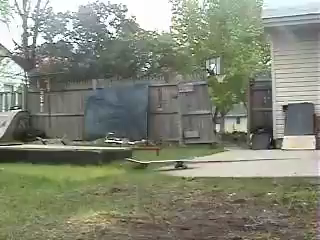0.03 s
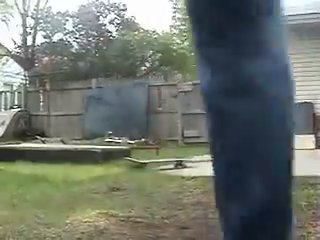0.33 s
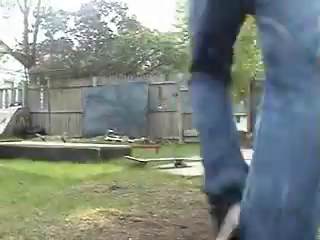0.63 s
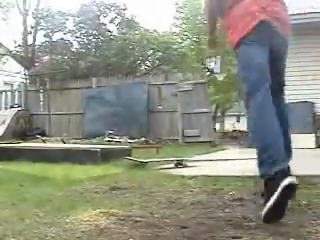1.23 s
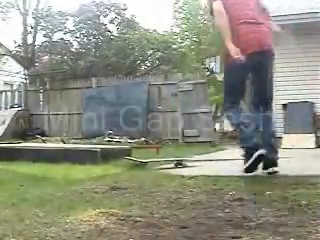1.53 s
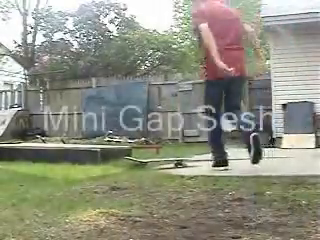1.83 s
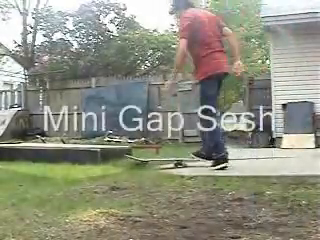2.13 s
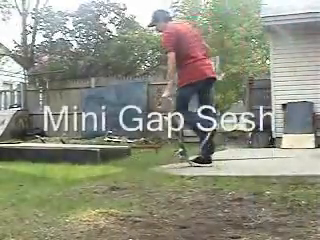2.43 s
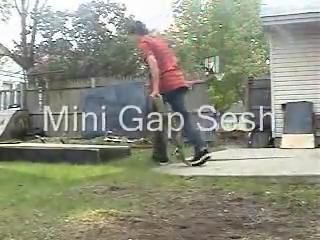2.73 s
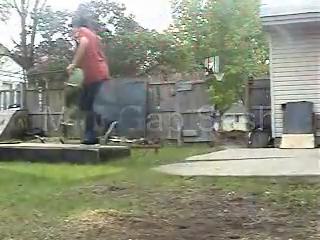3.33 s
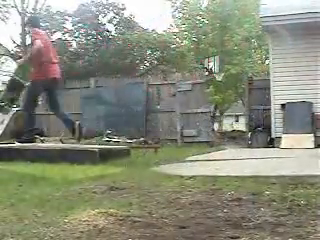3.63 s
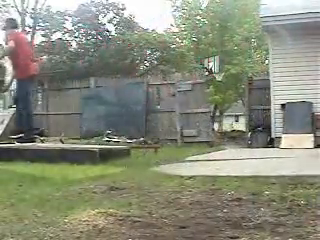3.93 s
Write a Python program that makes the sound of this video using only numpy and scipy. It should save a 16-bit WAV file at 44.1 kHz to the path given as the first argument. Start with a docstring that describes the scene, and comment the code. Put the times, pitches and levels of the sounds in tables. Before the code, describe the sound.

Footsteps pass close by from the start, with swishing trousers and a loud shoe scuff at about 0.4 seconds, then lighter steps and twig snaps until 1.3. At 2.2 seconds a skateboard knocks sharply on concrete, its metal parts clacking as it scrapes until about 2.6. A hollow wooden thump follows at 3.1. Wind rumbles on the microphone near the end, over faint traffic, leaves and a thin motor whine.

```python
"""Footsteps pass, one shoe scuffing close by; a skateboard knocks, clacks and scrapes; a box thumps.
A skater crosses a fenced backyard, past a camera on the ground. He stamps his board upright on the
concrete patio: blows ring the deck and metal trucks, grit shakes the dragged tail. Then he steps on
to a hollow wooden box. Behind: far traffic and leaves, wind on the microphone, the camera's motor."""
import sys
import numpy as np
from scipy import signal
from scipy.fft import rfft, irfft
from scipy.io import wavfile

SR = 44100
rng = np.random.default_rng(int(sys.argv[2]) if len(sys.argv) > 2 else 0)


def store_pcm(level_fs):
    """Save levels as 16-bit WAV."""
    pcm = np.round(np.clip(level_fs, -1, 1) * 32767).astype(np.int16)
    wavfile.write(sys.argv[1], SR, np.atleast_2d(pcm).T)


N = 176400
T = np.arange(N) / SR

# friction hiss of sole and cloth: f/Hz, density/dB
HISS_SPECTRUM = [(300, -15), (1200, 2), (2500, 1.5), (4000, -6), (7500, -14.5)]
# wooden deck: f/Hz, level/dB, t60/s
DECK_MODES = [(286, -8, 0.02), (520, -5.5, 0.024), (724, -3, 0.019), (950, 0, 0.021), (1300, 0, 0.029),
              (1630, -1.5, 0.024), (1940, -7, 0.03), (2340, -5, 0.022), (2580, -7.5, 0.017),
              (2990, -6.5, 0.013), (4500, -4.5, 0.0048), (5840, -5.5, .003)]


def from_db(db):
    """Decibels to gain."""
    return 10 ** (np.asarray(db) / 20)


def unit_rms(x):
    """Scale to unit power."""
    return x / np.sqrt(np.mean(x ** 2) + 1e-20)


def at_peak(x, db):
    """Scale to a peak level."""
    return from_db(db) * x / np.abs(x).max()


def held_gain(points):
    """Gain from (t/s, level/dB) points; ends held."""
    return from_db(np.interp(T, *np.transpose(points)))


def gated_gain(points):
    """Gain from (t/s, level/dB) points; zero outside them."""
    return held_gain(points) * (T >= points[0][0]) * (T <= points[-1][0])


def decay(start_s, t60_s):
    """Sudden onset, exponential fall."""
    return (T >= start_s) * from_db(-60 * np.maximum(T - start_s, 0) / t60_s)


def colour(x, points):
    """Filter by (f/Hz, gain/dB) points."""
    hz, db = np.transpose(points)
    bins_hz = np.arange(N // 2 + 1) * SR / N + 1e-3
    return irfft(rfft(x) * from_db(np.interp(np.log(bins_hz), np.log(hz), db)), N)


def noise(spectrum):
    """Coloured noise of unit power."""
    return unit_rms(colour(rng.standard_normal(N), spectrum))


def butter(x, edge_hz, kind="low", order=1):
    """Butterworth filter."""
    return signal.sosfilt(signal.butter(order, edge_hz, kind, fs=SR, output="sos"), x)


def mode(x, hz, t60_s):
    """One damped resonance, low-passed at its own pitch."""
    r, w = np.exp(-np.log(1000) / (t60_s * SR)), 2 * np.pi * hz / SR
    ringing = signal.lfilter([1, -r * np.cos(w)], [1, -2 * r * np.cos(w), r * r], x + 1e-18)
    return butter(ringing, hz)


def body(x, modes, vary_db=0):
    """An object's modes, alternating in sign, their levels scattered by vary_db."""
    return sum((-1) ** k * from_db(db + rng.normal(0, vary_db)) * mode(x, hz, t60_s)
               for k, (hz, db, t60_s) in enumerate(modes))


def click(t_s):
    """Unit impulse."""
    return (np.arange(N) == int(t_s * SR)) * 1.


def contact(t_s):
    """Hard contact: a click and a brief crack of crushed grit."""
    crack = rng.standard_normal(N) * decay(t_s, t60_s=0.011)
    return click(t_s) + from_db(-2.5) * crack / np.linalg.norm(crack)


def traffic_and_leaves():
    """A distant wash, wider in the treble."""
    spectrum = [(25, -20), (45, -13.5), (70, -7.5), (130, -5), (180, -3), (380, -6), (600, -3), (1100, -1),
                (1500, -5), (2100, -11.5), (3300, -20), (4700, -23.5), (6300, -27.5), (7800, -36.5)]  # wash: f/Hz, density/dB
    levels = [(.13, -29.5), (.7, -31), (1.2, -31.5), (2.0, -31), (3.0, -31), (4.0, -32)]  # slow drift: t/s, level/dB
    width = [(60, -32), (110, -28.5), (180, -23.5), (500, -18), (900, -12.5), (1500, -9.5), (2600, -6),
             (4400, -6.5), (7600, -16)]  # stereo width: f/Hz, side minus mid/dB
    side = colour(noise(spectrum), width)
    return (noise(spectrum) + np.array([side, -side])) * held_gain(levels)


def wind(gust_hz=14, gust_db=3.5):
    """Separate rumble at each microphone port, swelling in shared gusts."""
    spectrum = [(20, -7.5), (45, -0.5), (100, 0.5), (180, -9), (400, -22.5), (1000, -50.5)]  # rumble: f/Hz, density/dB
    levels = [(.13, -46), (.38, -47.5), (.6, -57), (.9, -74), (1.65, -76), (1.8, -61.5), (2.2, -60),
              (2.28, -51), (2.75, -55), (2.9, -39.5), (3.2, -38.5), (3.33, -31.5), (3.55, -40), (3.85, -37),
              (4.0, -45.5)]  # trend under the gusts: t/s, level/dB
    rumble = np.array([noise(spectrum), noise(spectrum)])
    gusts = unit_rms(butter(rng.standard_normal(N), gust_hz, order=2))
    return rumble * held_gain(levels) * from_db(gust_db * gusts)


def motor(rotation_hz=299.45, hum_hz=96, hum_width_hz=12, hum_db=-46.5):
    """Camera motor: an unsteady hum and a steady whine at multiples of the rotation rate."""
    harmonics = [(1, -56.5), (12, -63), (13, -64.5), (14, -64), (15, -61), (16, -63), (17, -63),
                 (18, -63.5), (19, -64.5), (20, -68.5)]  # whine: harmonic number, level/dB
    hum_t60_s = np.log(1000) / (np.pi * hum_width_hz)
    hum = unit_rms(mode(rng.standard_normal(N), hum_hz, hum_t60_s))
    whine = sum(from_db(db) * np.sqrt(2) * np.sin(2 * np.pi * (k * rotation_hz * T + rng.random()))
                for k, db in harmonics)
    return from_db(hum_db) * hum + whine


def swishes():
    """Trouser legs and soles brush as the legs swing."""
    brushes = [(0.178, 0.018, -34), (0.27, 0.11, -42), (0.371, 0.02, -31.5), (0.422, .003, -30),
               (0.553, 0.051, -39.5), (.655, 0.009, -41), (0.893, 0.023, -43), (1.294, 0.013, -39.5)]  # swells of hiss: centre t/s, half length/s, level/dB
    swing = sum(from_db(db) * np.exp(-((T - t_s) / half_s) ** 2) for t_s, half_s, db in brushes)
    return noise(HISS_SPECTRUM) * swing


def footsteps():
    """Each footfall: a thud, a slap of the sole and a dying crunch of the ground."""
    steps = [(.173, -16, 810, 0.014, -35), (.3803, -13.5, 720, .03, -43), (0.4263, -5.5, 297, .075, -38),
             (0.4743, -7.5, 229, 0.023, -34), (.4790, -12.5, 302, 0.0078, -41),
             (.4955, -21, 800, 0.014, -26.5), (.591, -17, 1110, .012, -30.5),
             (.880, -19.5, 500, 0.0094, -30.5), (1.274, -12.5, 540, 0.0082, -24)]  # footfalls: t/s, peak/dB, thud f/Hz, thud t60/s, crunch level/dB
    crunch_spectrum = [(100, -14), (250, 0.5), (800, 6.5), (1500, -1.5), (3000, -24.5), (7500, -24)]  # ground: f/Hz, density/dB
    out, crunch = 0, noise(crunch_spectrum)
    for t_s, db, hz, t60_s, crunch_db in steps:
        thud = mode(click(t_s), hz, t60_s)
        slap = from_db(-1.5) * mode(contact(t_s), hz=750, t60_s=0.014)
        blow = butter(thud + slap, 119, "high", order=2)  # a shoe on the ground gives little deep bass
        out = out + at_peak(blow, db) + from_db(crunch_db) * crunch * decay(t_s, t60_s=0.19)
    return out


def twigs():
    """Twigs and grit snap underfoot."""
    snaps = [(.3160, -19, 2900), (.7405, -13, 2900), (1.078, -20, 1600)]  # breaks: t/s, peak/dB, f/Hz
    return sum(at_peak(mode(contact(t_s), hz, t60_s=0.0027), db) for t_s, db, hz in snaps)


def shoe_rub(slips, hiss_db=-13.5):
    """Slips of the sole ring the shoe; friction adds hiss."""
    levels = [(.35, -47), (.378, -29), (.381, -17), (.402, -16.5), (.416, -18), (.424, -12), (.429, -15.5),
              (.434, -40), (.46, -61)]  # rubbing force: t/s, level/dB
    shoe_modes = [(195, -16, 0.069), (298, -7.5, 0.086), (470, -4, 0.1), (683, -1, 0.031),
                  (780, -1.5, 0.029), (1005, -2.5, 0.052), (1223, -5.5, .03), (1600, -4, 0.011),
                  (2013, -6.5, 0.032), (2900, -3.5, .006)]  # shoe: f/Hz, level/dB, t60/s
    force = gated_gain(levels)
    steady_rms = np.std(body(slips, shoe_modes, vary_db=2.5))
    ringing = body(slips * force, shoe_modes, vary_db=0.5) / steady_rms
    return ringing + from_db(hiss_db) * noise(HISS_SPECTRUM) * force


def scuff(slips_per_s=560, jitter=0.22, spread_db=2.5, wide_above_hz=1200, side_db=-11):
    """The near sole judders over the ground in uneven slips; the treble differs left and right."""
    slip_times_s = np.cumsum(np.exp(jitter * rng.standard_normal(4000))) / slips_per_s
    slips = np.diff(np.searchsorted(slip_times_s, T), prepend=0)
    strength = from_db(spread_db * rng.standard_normal(N))
    side = from_db(side_db) * shoe_rub(butter(rng.standard_normal(N), wide_above_hz, "high"))
    return shoe_rub(slips * strength) + np.array([side, -side])


def box():
    """Heel and toe thump on the hollow wooden box."""
    landings = [(3.1174, -14.5), (3.1348, -21)]  # heel, toe: t/s, peak/dB
    box_modes = [(101, -12, 0.14), (170, -8.5, 0.044), (283, -2, 0.048), (400, -6.5, .055), (673, -5, .025),
                 (1350, -10, .03), (1850, -5, 0.012)]  # box: f/Hz, level/dB, t60/s
    return sum(at_peak(body(click(t_s), box_modes), db) for t_s, db in landings)


def grains(per_s=3000, spread_db=4.5):
    """Random tiny impulses of uneven size."""
    hits = (rng.random(N) < per_s / SR) * rng.choice([-1, 1], N)
    return hits * from_db(spread_db * np.minimum(rng.exponential(1, N), 4))


def tail_scrape(rasp_db=1, rasp_exponent=1.36, side_db=-14):
    """Concrete grains shake the dragged tail and rasp, brighter under more pressure."""
    levels = [(2.236, -27), (2.256, -30.5), (2.268, -25.5), (2.285, -27.5), (2.32, -28), (2.35, -34.5),
              (2.42, -35.5), (2.47, -41), (2.53, -35.5), (2.62, -53)]  # pressure on the tail: t/s, level/dB
    rasp_spectrum = [(300, -22), (1000, -5), (2200, -1), (3600, -2), (5500, -9.5), (7500, -15.5)]  # concrete: f/Hz, density/dB
    pressure = gated_gain(levels)
    rasp_gain = from_db(rasp_db) * pressure.max() * (pressure / pressure.max()) ** rasp_exponent
    layers = []
    for _ in range(2):
        grit = grains()
        wood = unit_rms(body(np.diff(grit, prepend=0), DECK_MODES[:-2]))
        rasp = unit_rms(colour(grit, rasp_spectrum))
        layers.append(wood * pressure + rasp * rasp_gain)
    mid, side = layers
    return mid + from_db(side_db) * np.array([side, -side])


def truck_clacks(strike_q=2.13):
    """Loose trucks and grit click; each strike favours the metal's modes near its own band."""
    strikes = [(2.1018, -22, 7200), (2.2536, -11, 6300), (2.2748, -3, 3900), (2.2908, -25, 5500),
               (2.297, -19, 8500), (2.319, -18.5, 2700), (2.325, -17.5, 3600), (2.531, -21, 4700),
               (2.5388, -8.5, 4740), (2.5400, -10.5, 6000), (2.5410, -17, 2300), (2.563, -29, 7000)]  # clacks: t/s, peak/dB, band centre f/Hz
    truck_modes = [(2370, -7, .016), (2900, -3, .014), (3490, -2, 0.017), (4110, -0.5, 0.017),
                   (4500, -5, 0.016), (4980, -5, 0.011), (5420, -4.5, .009), (6360, -5, 0.0087),
                   (7400, -5, 0.0055)]  # metal: f/Hz, level/dB, t60/s
    out = 0
    for t_s, db, hz in strikes:
        b, a = signal.iirpeak(hz, strike_q, fs=SR)
        strike = signal.lfilter(b, a, signal.lfilter(b, a, contact(t_s)))
        out = out + at_peak(body(strike, truck_modes, vary_db=5), db)
    return out


def deck_knocks():
    """The tail hits concrete; each band-limited blow rings the deck."""
    blows = [(2.2327, 3, 150, 8000), (2.2356, -9, 800, 3500), (2.2665, -12.5, 600, 2200),
             (2.2700, -8, 1100, 2500)]  # knocks: t/s, peak/dB, low edge f/Hz, high edge f/Hz
    out = 0
    for t_s, db, low_hz, high_hz in blows:
        blow = butter(contact(t_s), [low_hz, high_hz], "band")
        out = out + at_peak(body(blow, DECK_MODES, vary_db=1), db)
    return out


def yard(x, cutoff_hz=4000, tail_t60_s=0.52, tail_db=-14.5):
    """Two dull echoes and a short diffuse tail, partly shared by left and right."""
    reflections = [(.009, -20), (.043, -22)]  # house and fence: delay/s, level/dB
    dull = butter(x, cutoff_hz)
    echoes = sum(from_db(db) * np.interp(T - delay_s, T, dull, left=0) for delay_s, db in reflections)
    tails = rng.standard_normal((2, N)) * decay(0, tail_t60_s)
    tails = tails + tails.mean(axis=0)
    tails /= np.linalg.norm(tails, axis=1, keepdims=True)
    return echoes + from_db(tail_db) * signal.fftconvolve(dull[None], tails, axes=1)[:, :N]


def scene():
    """Stereo mix; only the knocks and clacks ring out in the yard."""
    board = deck_knocks() + truck_clacks()
    background = traffic_and_leaves() + wind() + motor()
    skater = footsteps() + twigs() + scuff() + swishes() + box()
    return background + skater + board + tail_scrape() + yard(board)


def record(dry):
    """The camera starts, rounds the peaks, turns down after loud sounds and cuts the treble."""
    start_s, fade_s, ceiling, cutoff_hz = 0.128, 0.0026, 0.88, 7980
    threshold_db, cut_share, window_s, release_db_per_s = -17, 0.66, 0.014, 64
    x = dry * np.clip((T - start_s) / fade_s, 0, 1)
    x = ceiling * np.tanh(x / ceiling)
    pole = np.exp(-1 / (window_s * SR))
    power = signal.lfilter([1 - pole], [1, -pole], x.mean(axis=0) ** 2)
    target_cut_db = cut_share * np.maximum(10 * np.log10(power + 1e-12) - threshold_db, 0)
    release_db = release_db_per_s * T
    cut_db = np.maximum.accumulate(target_cut_db + release_db) - release_db
    low_pass = signal.firwin(601, cutoff_hz, window="blackman", fs=SR)
    return signal.fftconvolve(x * from_db(-cut_db), low_pass[None], mode="same", axes=1)


dry = scene()
out = record(dry)
store_pcm(out)
```